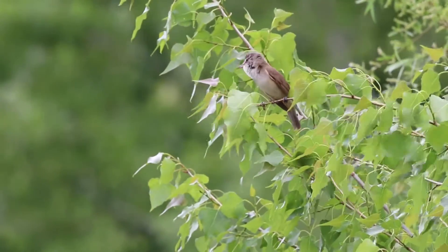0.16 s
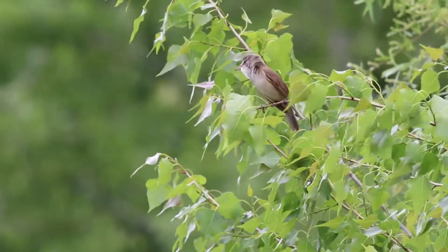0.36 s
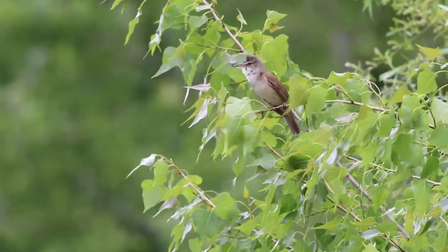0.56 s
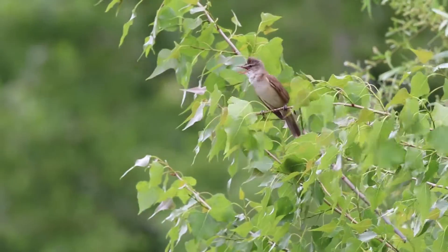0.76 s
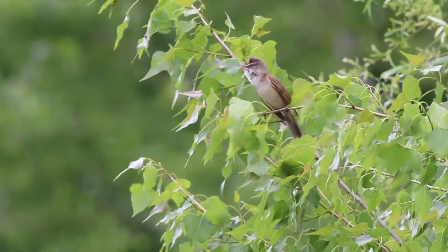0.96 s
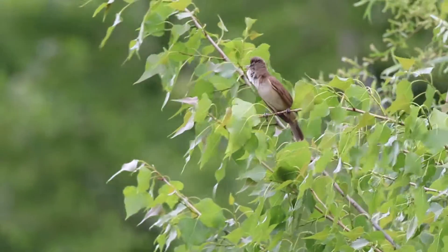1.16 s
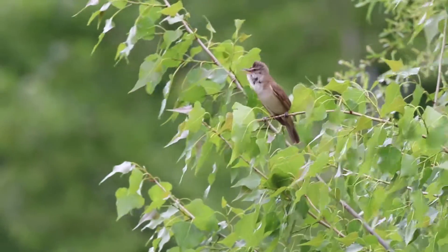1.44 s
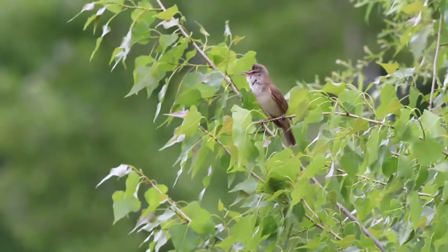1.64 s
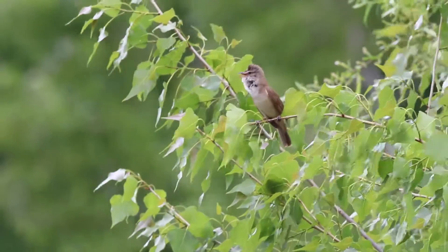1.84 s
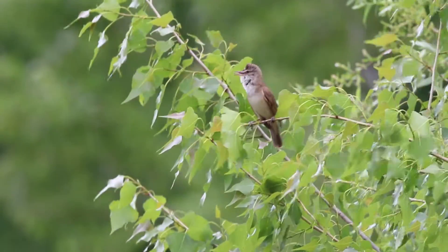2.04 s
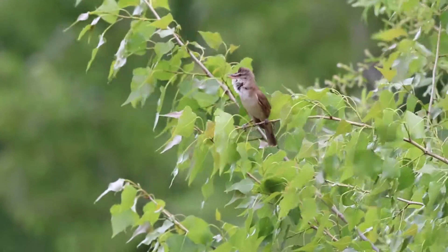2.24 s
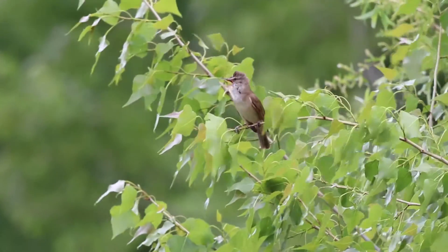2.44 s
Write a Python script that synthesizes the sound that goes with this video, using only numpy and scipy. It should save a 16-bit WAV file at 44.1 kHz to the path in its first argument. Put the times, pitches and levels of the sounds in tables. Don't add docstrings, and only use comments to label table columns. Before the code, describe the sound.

A warbler rasps harsh, chattering notes, growing louder, while wind buffets the microphone outdoors.

```python
import sys
import numpy as np
from scipy import signal
from scipy.fft import rfft, irfft
from scipy.io import wavfile
from scipy.ndimage import uniform_filter1d

SR = 44100
rng = np.random.default_rng(int(sys.argv[2]) if len(sys.argv) > 2 else 0)


def decibels_to_gain(level_db):
    exponent = np.asarray(level_db, float) / 20
    return 10 ** exponent


def to_wav(sig):
    pcm = np.clip(np.atleast_2d(sig), -1, 1) * 32767
    pcm = np.round(pcm).astype(np.int16)
    wavfile.write(sys.argv[1], SR, pcm.T)


N = 114219
T = np.arange(N) / SR


def unit(x):
    return x / np.sqrt(np.mean(x ** 2))


def colour(x, points):
    points_hz, points_db = np.array(points).T
    f = np.arange(N // 2 + 1) * SR / N + 1
    curve_db = np.interp(np.log(f), np.log(points_hz), points_db)
    curve_db = curve_db - 46 * np.clip(np.log2(points_hz[0] / f), 0, 9)
    return irfft(rfft(x) * decibels_to_gain(curve_db), N)


def walk(rate):
    k = int(SR / rate)
    return unit(uniform_filter1d(uniform_filter1d(rng.standard_normal(N), k), k))


def pan(x, db):
    return x * decibels_to_gain(np.array([db / 2 + 0 * x, -db / 2 + 0 * x]))


def pair(make, alike):
    alike = np.clip(alike, 0, 1)
    return np.sqrt(alike) * make() + np.sqrt(1 - alike) * np.array([make(), make()])


def add(out, s, x):
    i = max(int(s * SR), 0)
    out[..., i:i + x.shape[-1]] += x[..., :N - i]


def echoes(x, t60, db):
    t = T[:SR]
    tail = rng.standard_normal((2, SR)) * decibels_to_gain(-60 * t / t60) * (t > .003)
    tail = tail / np.sqrt(np.sum(tail ** 2) / 2)
    return decibels_to_gain(db) * signal.fftconvolve(x[None], tail, axes=1)[:, :N]


def whistle(hz, db):
    tone = np.sin(2 * np.pi * np.cumsum(hz) / SR)
    return np.sqrt(2) * decibels_to_gain(db) * tone * signal.windows.tukey(len(hz), .3)


def warbler():
    # start t/s, level/dB, pitch factor, left-right/dB, tempo stretch
    soft_notes = [
        (.274, -38, 1.0, -3, 1),
        (.596, -33.5, 1.0, -4, 1),
        (.818, -43, 0.92, 0, 1.15),
        (1.040, -43, .9, -3, 1),
        (.533, -45.5, 1.1, 0, .55),
    ]
    loud_notes = [
        (1.173, -33, .95, -4, .95),
        (1.888, -27.5, 1, -1, .98),
        (2.273, -26, .99, -3, 1.03),
    ]
    reply_notes = [
        (1.536, -30.5, .93, -4, 1),
        (1.315, -31, .97, -3.5, 1),
        (1.673, -27, 1.02, -3, 1),
        (2.023, -26.5, 1, -1.5, 1),
        (2.410, -27, 1.01, -2.5, 1.02),
    ]
    # offset t/s, length t/s, start f/Hz, end f/Hz, level/dB, roughness 0-1
    soft_pips = [
        (.0, .005, 2900, 2750, -3, .3),
        (.011, .008, 2300, 2700, -1.5, 1),
        (.022, .007, 3000, 2700, -7, .7),
        (.032, .009, 2300, 2800, -0.1, .75),
        (.044, .005, 2500, 2100, -2, .7),
    ]
    loud_pips = [
        (.0, 0.0038, 3000, 3100, -6.5, 0.85),
        (.006, 0.0066, 2770, 2870, -2, 0.54),
        (.013, 0.01336, 3400, 2335, 0.9, 0.39),
        (0.03, 0.0095, 2260, 2645, -3, 0.48),
        (0.041, .006, 2800, 2840, -10.5, 0.78),
        (0.054, 0.00753, 2364, 2610, -5.5, 0.63),
        (.062, 0.0083, 2380, 2300, -10.5, 0.22),
    ]
    reply_pips = [
        (.0, 0.0055, 3110, 3350, -12, 0.81),
        (.007, 0.0043, 3210, 3050, -2, 0.67),
        (0.013, .017, 3352, 2322, 1.37, 0.5),
        (.032, 0.0073, 2220, 2600, -4.5, 0.66),
        (.043, .005, 2900, 2900, -16, .85),
        (.055, 0.0054, 2270, 2480, -12, 0.97),
    ]
    overtone_levels = (-33, -32, -38)
    overtone_multiples = (2, 2.8, 3.5)

    rasp_hz, buzz_hz, buzz_share, throb_hz = 1100, 780, .35, 210
    rasp = (walk(rasp_hz * 2) + 1j * walk(rasp_hz * 2)) / np.sqrt(2)
    beat = np.exp(2j * np.pi * np.cumsum(buzz_hz * (1 + .15 * walk(144.3))) / SR)
    buzz = (beat + 0.8 / beat + 0.25 * beat ** 2) / 1.3
    grain = np.sqrt(1 - buzz_share) * rasp + np.sqrt(buzz_share) * buzz
    jangle = rasp ** 2 / abs(rasp) ** 1.5

    out = np.zeros((2, N))
    for notes, pips in ((soft_notes, soft_pips), (loud_notes, loud_pips), (reply_notes, reply_pips)):
        for start, db, factor, side_db, tempo in notes:
            luck = rng.standard_normal((len(pips), 2))
            slur = np.clip((-db - 30) / 8, 1, 1.2)
            for (off, length, hz0, hz1, pip_db, rough), (r, q) in zip(pips, luck):
                off, length = off * tempo, length * tempo * slur
                i, n = int((start + off) * SR), int(length * SR)
                u = np.arange(n) / n
                rough = np.clip(rough, 0, 1)
                glide = hz0 + (hz1 - hz0) * u
                phase = 2 * np.pi * np.cumsum(factor * glide) / SR
                throb = 1 + .6 * np.sin(2 * np.pi * (throb_hz * u * length + q))
                z = np.exp(1j * phase) * (np.sqrt(1 - rough ** 2) * throb + rough * grain[i:i + n])
                z = z / np.sqrt(np.mean(abs(z) ** 2))
                for k, over_db in enumerate(overtone_levels):
                    strength = decibels_to_gain(over_db + (db + 27) * .9) * (glide / 2900) ** 2
                    overtone = np.exp(1j * overtone_multiples[k] * phase)
                    z = z + strength * overtone * jangle[i + 400 * (k + 1):][:n]
                scatter_db = 1.1 * r
                envelope = np.sqrt(2) * decibels_to_gain(db + pip_db + scatter_db) * np.sin(np.pi * u) ** .5
                add(out, start + off, pan(envelope * z.imag, side_db))
    return out


def wind():
    # t/s, level/dB, left-right/dB
    gust = [(0, -28, 0), (.25, -28.5, -4.5), (0.299, -30.5, -2.5), (.42, -28, -5), (0.618, -32.5, -2.5),
            (0.709, -38, -2.5), (0.923, -28.5, -9), (1.011, -41, -6.5), (1.07, -35, -7), (1.4, -31, -8.5),
            (1.699, -34, -11.5), (1.799, -46.5, -2), (1.9, -36, -14), (1.999, -52, -9),
            (2.28, -45.5, -11.5), (2.4, -46, -11.5), (2.59, -44, -8)]
    # f/Hz, level/dB per Hz
    wind_spectrum = [(25, -18), (45, -0.5), (80, 0.3), (130, -2.5), (200, -6), (320, -15), (500, -20.5),
                     (900, -53)]
    s, db, side_db = np.array(gust).T
    side_db = np.interp(T, s, side_db)
    f = np.arange(N // 2 + 1) * SR / N + 1
    flutter_db, flutter_hz, alike_below_hz, lee_hz = 3.5, 24, 210, 151

    out = 0
    for hz in 30 * 2 ** np.arange(0, 5, .75):
        band = np.exp(-(np.log2(f / hz) / .5) ** 2)

        def eddies():
            noise = colour(rng.standard_normal(N), wind_spectrum)
            return irfft(rfft(noise) * band, N) * decibels_to_gain(flutter_db * walk(flutter_hz))

        lean = side_db * min(hz / lee_hz + 0.65, 1.3)
        out = out + pan(np.ones(N), lean) * pair(eddies, 1 / (1 + hz / alike_below_hz))
    steady = unit(out / pan(np.ones(N), side_db))
    return steady * pan(decibels_to_gain(np.interp(T, s, db) + 0.5), side_db)


def eddy(out, s, db, hz, side_db, cycles, r):
    u = np.arange(-int(2 * SR / hz), int(2 * SR / hz)) * hz / SR
    puff = np.exp(-(u / cycles) ** 2) * np.cos(2 * np.pi * (u + r))
    lead = max(int((2 / hz - s) * SR), 0)
    right = 2 / (1 + decibels_to_gain(side_db)) * decibels_to_gain(db)
    add(out, s - 2 / hz, right * np.outer([decibels_to_gain(side_db), 1], puff[lead:]))


def thumps():
    # t/s, peak level/dB, f/Hz, left-right/dB
    thump_list = [(0.068, -24.5, 230, -7), (0.094, -20.5, 275, -5.5), (0.129, -19, 206, -2),
                  (0.215, -18.5, 160, -1), (0.396, -20.5, 199, -8), (0.449, -20, 170, -6),
                  (0.549, -24, 85.4, 0), (0.566, -24.5, 281.6, -20), (0.783, -26.5, 160, -18),
                  (0.908, -25.5, 226, -16), (1.049, -24, 224.4, -13), (1.103, -28.5, 276, -18),
                  (1.197, -27.5, 274, -15), (1.246, -29.5, 316, -28), (1.299, -29.5, 232, -24),
                  (1.415, -24, 330, -12), (1.414, -23.5, 96, -24), (1.472, -22, 234, -33),
                  (1.534, -28, 138, -17), (1.577, -33, 460, -3), (1.624, -22.5, 314, -24),
                  (1.691, -15.5, 344, -33), (1.889, -21.5, 104, -22), (2.274, -26, 116, -28),
                  (2.352, -32.5, 260, -14)]
    out = np.zeros((2, N))
    for (s, db, hz, side_db), (r, r_thud) in zip(thump_list, rng.random((len(thump_list), 2))):
        eddy(out, s, db + 2.5, hz, side_db, 0.72, r)
        eddy(out, s, db + 2.5 - 3.5, max(hz * 0.39, 45), side_db, 0.72, r_thud)
    return out


def rolls():
    # t/s, peak level/dB, f/Hz, left-right/dB
    roll_list = [(0.015, -21.5, 98, -8), (0.043, -38, 120, 10), (.166, -18, 76, 1), (0.252, -18, 73.6, -1),
                 (0.28, -22, 107, 0), (.335, -22.5, 119.7, -1), (.366, -24.5, 88, 1), (.466, -18, 95, 2),
                 (0.496, -24.5, 98.5, -3), (0.598, -24, 65.4, -1), (.665, -26, 120, -4),
                 (0.887, -25, 117, -5), (.928, -20.5, 108.2, -5), (1.067, -22, 129.6, -12),
                 (1.152, -29, 108, -17), (2.02, -32, 152, -16), (2.051, -42, 81, -20),
                 (2.141, -33.5, 78, -28), (2.186, -29.5, 74.4, -6), (2.294, -28, 70, -15),
                 (2.316, -32, 99, -22), (2.375, -34, 65, -22), (2.443, -28, 99, -22),
                 (2.468, -31.5, 91, -19), (2.5, -26.5, 121, -39), (2.528, -31, 110, -27),
                 (2.582, -25.5, 82, -12)]
    out = np.zeros((2, N))
    for (s, db, hz, side_db), r in zip(roll_list, rng.random(len(roll_list))):
        eddy(out, s, db, hz, side_db, 0.7, r)
    return out


def frogs():
    # f/Hz, width f/Hz, level/dB
    near_sacs = [
        (414.5, 82, -6),
        (711.5, 44.6, 0.4),
        (758.8, 90, 1),
        (780, 11, -22),
    ]
    far_sacs = [
        (1286.5, 104, 11.5),
        (1140, 290, 3.5),
    ]

    def chorus(sacs):
        x = 1.96 * rng.standard_normal(N)
        for k in range(4):
            rate_hz = 58 * (.8 + .13 * k) * (1 + .06 * walk(9))
            phase = np.cumsum(rate_hz) / SR
            pulses = np.diff(np.floor(phase), prepend=0)
            x += unit(pulses) * decibels_to_gain(3 * walk(3.3))
        out = 0
        for hz, width, db in sacs:
            b, a = signal.iirpeak(hz, hz / (0.97 * width), fs=SR)
            ring = signal.lfilter(b, a, signal.lfilter(b, a, x))
            out = out + decibels_to_gain(db + 3 * walk(16.5)) * unit(ring)
        return unit(out)

    near = pan(decibels_to_gain(-41.5) * np.ones(N), -8) * pair(lambda: chorus(near_sacs), 0.72)
    far = decibels_to_gain(-55) * np.array([chorus(far_sacs), chorus(far_sacs)])
    return near + far


def far_birds():
    # peak t/s, rise t/s, fall t/s, top f/Hz, level/dB
    arcs = [
        (.893, .06, .052, 5200, -5),
        (1.238, .028, .05, 5100, -3),
        (1.391, .022, .05, 5330, 0),
        (1.578, .01, .036, 5350, -7),
        (2.045, .075, -.008, 5600, -4),
        (.51, .068, -.022, 4650, 1),
    ]
    # t/s, f/Hz, level/dB
    trill = [
        (0.891, 7260, -64),
        (0.907, 5480, -59),
        (.921, 7120, -63),
        (0.929, 7150, -68),
        (.941, 6300, -52),
        (0.958, 7260, -57),
        (0.963, 7360, -49),
        (0.976, 6250, -43.5),
        (0.988, 6000, -47),
    ]
    # start t/s, length t/s, start f/Hz, end f/Hz, level/dB
    peeps = [
        (0.33, 0.045, 2944, 2975, -53.5),
        (0.379, 0.077, 2960, 2940, -65),
        (0.564, .018, 3050, 2905, -56),
        (2.537, 0.023, 2740, 3280, -49),
        (2.57, 0.013, 3140, 2670, -44.5),
        (.002, 0.016, 2290, 2170, -51),
    ]
    out, quaver = np.zeros(N), walk(120)
    for peak, rise, fall, top_hz, db in arcs:
        t = np.arange(-int(rise * SR), int(fall * SR)) / SR
        u = np.where(t < 0, -t / .085, t / .056)
        hz = top_hz - (top_hz - 3000) * np.sin(np.pi / 2 * u) ** 2
        arc_db = -60 + db + np.where(t < 0, -3.0, 2.5) * u + 2.2 * quaver[:len(t)]
        add(out, peak - rise, whistle(hz, arc_db))
        quaver = quaver[len(t):]
    s, hz, db = np.array(trill).T
    t = np.arange(s[0], s[-1], 1 / SR)
    add(out, s[0], whistle(uniform_filter1d(np.interp(t, s, hz), 200), np.interp(t, s, db)))
    for start, length, hz0, hz1, db in peeps:
        add(out, start, whistle(np.linspace(hz0, hz1, int(length * SR)), db))
    return out


def marsh():
    # f/Hz, level/dB per Hz
    hiss_spectrum = [(250, -5), (550, -1), (1000, -11.5), (1800, -15.5), (2600, -12.5), (4500, -28),
                     (9000, -30), (15500, -38)]
    hiss = pair(lambda: unit(colour(rng.standard_normal(N), hiss_spectrum)) * decibels_to_gain(1.0 * walk(13.5)), .05)
    whine = np.sqrt(2) * decibels_to_gain(-76.5) * np.sin(2 * np.pi * 15638 * T)
    return decibels_to_gain(-45.5) * hiss + whine


def traffic():
    # f/Hz, level/dB per Hz
    rumble_spectrum = [(30, -16), (42, 2), (90, -10), (160, -21), (300, -36), (600, -55)]
    return decibels_to_gain(-42.5) * pair(lambda: unit(colour(rng.standard_normal(N), rumble_spectrum)), 0.86)


def scene():
    bird, far = warbler(), far_birds()
    mid = bird.mean(0)
    leaves = echoes(mid, 0.098, -8.5)
    distance = echoes(mid, 0.53, -13.5)
    wet = leaves + distance + echoes(far, 0.16, -5)
    birds = bird + pan(far, -0.26) + wet
    return birds + wind() + thumps() + rolls() + frogs() + marsh() + traffic()


def roll_off(x):
    return signal.sosfilt(signal.butter(12, 15850, fs=SR, output="sos"), x)


def record(dry):
    # f/Hz, left-right/dB
    port_tilt = [
        (1500, 0.7),
        (3000, 0.27),
        (5000, 3.5),
        (8000, 3),
        (14000, 1),
    ]
    ports = np.array([colour(dry[0], [(1, 0)] + list(port_tilt)), dry[1]])
    top_cut = signal.ellip(8, .2, 70, 15800, fs=SR, output="sos")
    mix = signal.sosfilt(top_cut, ports)
    return roll_off(mix)


dry = scene()
out = record(dry)
to_wav(out)
```